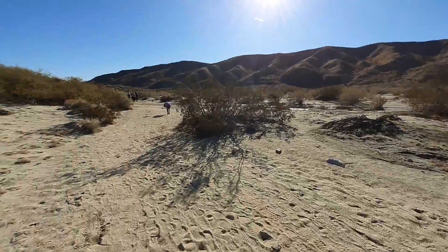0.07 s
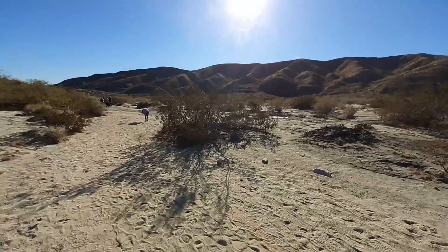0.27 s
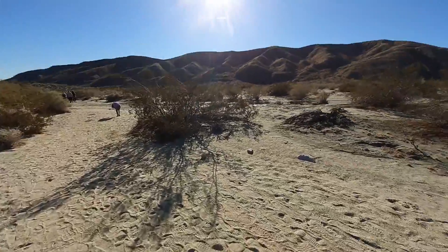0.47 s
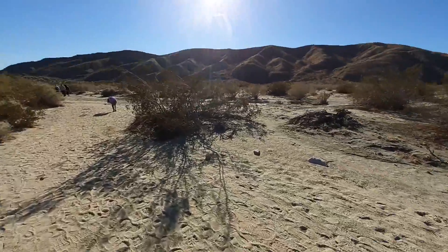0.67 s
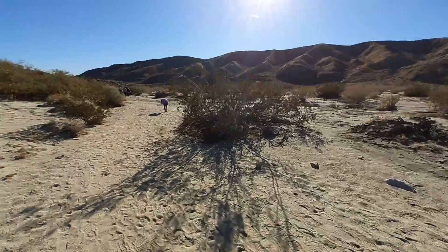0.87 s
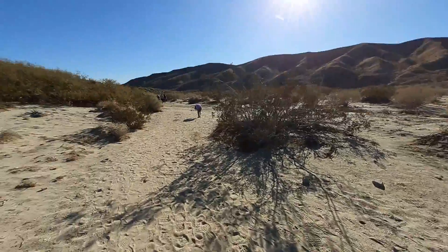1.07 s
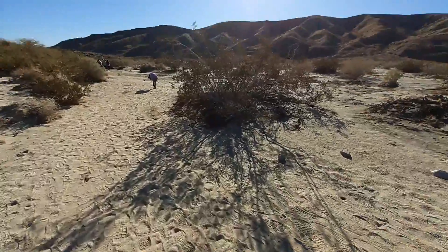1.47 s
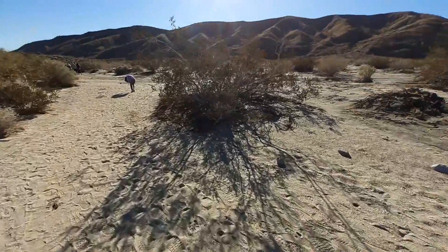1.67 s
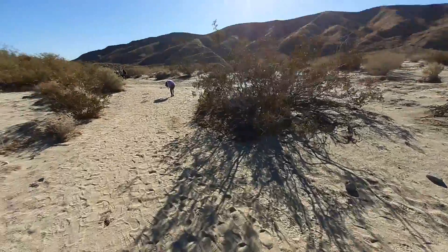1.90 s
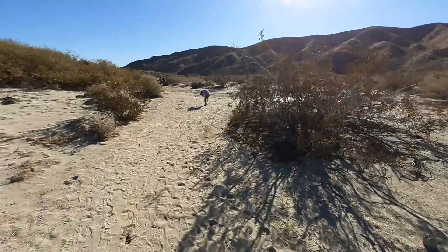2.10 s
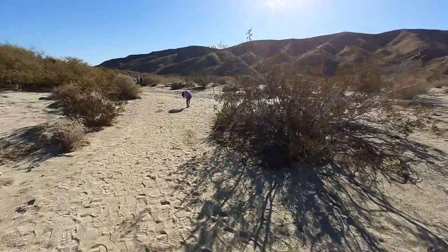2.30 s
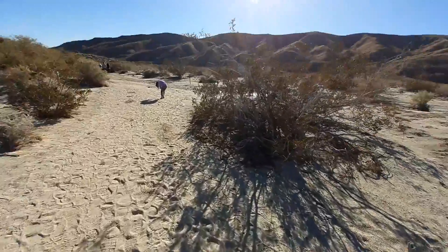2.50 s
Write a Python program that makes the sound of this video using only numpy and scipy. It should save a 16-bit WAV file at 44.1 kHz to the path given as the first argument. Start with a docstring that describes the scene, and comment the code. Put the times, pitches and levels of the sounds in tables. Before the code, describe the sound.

Light wind buffets the microphone throughout, a low rumble with soft thumps and hiss, mostly on the right. It gusts hardest from 0.7 to 1 second, swells again around 1.3 and 1.8, then eases. Underneath, five soft steps crunch on sand at about 0.1, 0.7, 1.2, 1.7 and 2.2 seconds. Carried gear rustles close by, with tiny metal clinks, clearest near 0.9 and 1.3 seconds. There is no echo.

```python
"""Light wind buffets the microphone of a hand-held camera, mostly its right port, over a soft hiss.
Below it, five walking steps cross a sandy desert trail, in open air with no echo.
Each sole grinds through the sand and snaps a few bits of grit. Close by, carried gear rustles
and small metal pieces, perhaps zip pulls, knock and ring with the stride."""
import sys
import numpy as np
from scipy import signal
from scipy.fft import rfft, irfft, next_fast_len
from scipy.io import wavfile
from scipy.ndimage import uniform_filter1d

SR = 44100
rng = np.random.default_rng(int(sys.argv[2]) if len(sys.argv) > 2 else 0)


def wav_out(sig):
    """Save sig, one row per channel (or a flat mono array), as 16-bit PCM at SR to the path in sys.argv[1]."""
    wavfile.write(sys.argv[1], SR, np.round(np.clip(np.atleast_2d(sig).T, -1, 1) * 32767).astype(np.int16))


N = 116865


def undb(db):
    return 10 ** (np.asarray(db) / 20)


def unit(x):
    """Scale to rms 1."""
    return x / np.sqrt(np.mean(x ** 2) + 1e-20)


def pan(db):
    """Gains for the two ports, the left louder by db."""
    return unit(undb(np.array([[db], [-db]]) / 2))


def curve(points):
    """Points joined by straight lines in time."""
    return np.interp(np.arange(N) / SR, *np.array(points).T)


def over_hz(points, size):
    """Points joined on a log-frequency axis, one value per bin."""
    hz, value = np.array(points).T
    bin_hz = np.arange(size // 2 + 1) * SR / size
    return np.interp(np.log(bin_hz + 1), np.log(hz), value)


def colour(x, spectrum, size=4096):
    """Causal filter of unit energy: only the shape of the spectrum counts."""
    cepstrum = irfft(np.log(undb(over_hz(spectrum, size))))
    cepstrum[1:size // 2] *= 2  # fold to minimum phase
    cepstrum[size // 2 + 1:] = 0
    impulse = irfft(np.exp(rfft(cepstrum)))
    return signal.fftconvolve(x, impulse[None] / np.linalg.norm(impulse))[:, :N]


def grains(per_s, spread_db):
    """Random clicks, many small and a few large, at the same moments on both ports; rms 1."""
    hit = rng.random(N) < per_s / SR
    size = undb(spread_db * np.minimum(rng.exponential(size=N), 5))
    return unit(hit * size * rng.standard_normal((2, N)))


def burst(start, decay_s, crack_db):
    """A sharp click on both ports, then noise that dies away."""
    age = np.arange(N) - int(start * SR)
    tail = (age >= 0) * np.exp(-np.abs(age) / SR / decay_s) * rng.standard_normal((2, N))
    return tail + undb(crack_db) * (age == 0)


def wander(per_s):
    """Random levels joined smoothly; rms 1."""
    hold = int(SR / per_s)
    stairs = np.repeat(rng.standard_normal(N)[:N // hold + 1], hold)
    return unit(uniform_filter1d(stairs, hold)[:N])


# How alike the microphone's two ports sound. Each row: frequency in Hz, correlation.
PORT_LIKENESS = [(200, 1), (900, 0.75), (1600, 0.3), (2600, 0.04), (6000, 0.076), (16000, 0.11)]
def at_ports(pair):
    """Turn two unrelated signals into a left and right that agree in the bass."""
    size = next_fast_len(2 * N)
    alike = np.clip(over_hz(PORT_LIKENESS, size), -.95, .98)
    first, second = rfft(pair, size)
    mid = first * np.sqrt((1 + alike) / 2)
    side = second * np.sqrt((1 - alike) / 2)
    return irfft(np.array([mid + side, mid - side]), size)[:, :N]


# Wind right on the microphone, port by port. Each row: time in seconds, level in dB.
WIND_LEFT = [(0, -50), (.4, -48.5), (.65, -43), (.8, -29.5), (.94, -36.5), (1.08, -47), (1.35, -48),
             (1.65, -47.5), (1.82, -38.5), (1.99, -40), (2.099, -50), (2.38, -54), (2.461, -40.5),
             (2.6, -52.5)]
WIND_RIGHT = [(0, -38.5), (.14, -36), (.35, -35.5), (.57, -35.5), (.65, -29.5), (.78, -28.5), (.93, -27),
              (1.03, -35.5), (1.3, -32), (1.42, -41.5), (1.498, -34.5), (1.6, -53), (1.72, -32.5),
              (1.97, -34.5), (2.04, -47.5), (2.14, -35.5), (2.33, -41), (2.54, -57), (2.65, -42)]
# Tone of the rumble on each port. Each row: frequency in Hz, relative level in dB.
RUMBLE_LEFT = [(20, -32.5), (35, -20), (55, 6), (90, 1), (150, -10), (230, -14.5), (330, -18.5), (480, -30),
               (800, -33.5), (2000, -51.5)]
RUMBLE_RIGHT = [(20, -47.5), (35, -35), (55, 1), (100, 2.5), (160, -2), (230, -11.5), (330, -19.5),
                (480, -36.5), (800, -53), (2000, -86.5)]
def wind_rumble():
    """Eddies buffet each port separately."""
    ports = []
    for spectrum, level in ((RUMBLE_LEFT, WIND_LEFT), (RUMBLE_RIGHT, WIND_RIGHT)):
        eddies = colour(grains(per_s=900, spread_db=1.5), spectrum)[0]
        ports.append(unit(eddies) * undb(curve(level)))
    return np.array(ports)


# Wind fluttering at the microphone. Each row: time in seconds, level in dB.
FLUTTER_LEVEL = [(0, -58), (.3, -85), (.45, -57), (.56, -62.5), (.78, -52), (.93, -54.5), (1.12, -54),
                 (1.25, -52.5), (1.4, -64), (1.47, -51), (1.58, -66), (1.71, -51.5), (2.0, -63), (2.3, -61),
                 (2.6, -76)]
# Its tone, strongest near 330 Hz. Each row: frequency in Hz, relative level in dB.
FLUTTER_TONE = [(100, -20.5), (220, -2.5), (330, 2.5), (480, -6), (800, -13.5), (1500, -35), (4000, -43)]
def wind_flutter():
    """Small quick eddies patter above the rumble."""
    patter = at_ports(colour(grains(per_s=350, spread_db=3.5), FLUTTER_TONE))
    return patter * undb(curve(FLUTTER_LEVEL)) * pan(-2.5)


# Hiss behind the wind. Each row: time in seconds, relative level in dB.
HISS_LEVEL = [(0, -55.5), (.1, -59.5), (.25, -52), (.37, -64.5), (.47, -55.5), (.65, -59.5), (.76, -51.5),
              (.92, -54.5), (1.05, -52), (1.28, -53.5), (1.42, -59.5), (1.52, -54), (1.65, -57), (1.8, -56),
              (1.91, -60), (2.02, -54), (2.3, -54.5), (2.45, -66), (2.6, -56)]
# Tones of the hiss and the open air. Each row: frequency in Hz, relative level in dB.
HISS_TONE = [(700, -16), (1300, -2.5), (2200, 2), (3000, -1), (4000, -19), (6000, -22.5), (16000, -19.5)]
AIR_TONE = [(100, 17), (400, 4), (600, -2.5), (1200, 3.5), (1700, 0), (2600, -8), (5000, -25), (16000, -35)]
def hiss():
    """A soft hiss on the right swells, sinks and flickers; duller air on both sides follows it."""
    hiss_db = curve(HISS_LEVEL) + 0.97 * wander(per_s=45)
    air_db = -58 + 0.79 * (hiss_db - hiss_db.mean())
    bright = colour(rng.standard_normal((2, N)), HISS_TONE) * undb(hiss_db - 4.5) * pan(-28)
    dull = at_ports(colour(rng.standard_normal((2, N)), AIR_TONE)) * undb(air_db)
    return bright + dull


# Modes of the metal pieces. Each row: pitch in Hz, relative level in dB, seconds to fall 60 dB.
METAL_MODES = [(6220, 7, 0.059), (6750, 11.5, .025), (8680, 5, 0.075), (9950, 15, 0.01),
               (10750, 16.5, 0.087), (11800, 7, 0.054), (13200, 0, 0.059), (13400, -24, 0.019),
               (15100, -2, 0.11), (15600, 20, 0.028)]
def metal_ring(knocks, favoured_hz=None, size=8192):
    """Struck metal rings, a little detuned on each call; modes near a favoured pitch are lifted."""
    lift_db, width_hz, detune = 10, 694, .005
    hz, db, t60 = np.array(METAL_MODES).T[:, :, None]
    t = np.arange(size) / SR
    if favoured_hz is not None:
        db = db + lift_db * np.exp(-((hz - favoured_hz) / width_hz) ** 2)
    hz = hz * (1 + detune * rng.standard_normal(hz.shape))
    phase = rng.random((2, len(METAL_MODES), 1))
    decay = undb(db) / np.sqrt(t60) * np.exp(-np.log(1000) * t / t60)
    impulse = (decay * np.sin(2 * np.pi * (hz * t + phase))).sum(axis=1)
    return signal.oaconvolve(knocks, unit(impulse) / np.sqrt(size), axes=1)[:, :N]


# Gear stirring close to the microphone. Each row: time in seconds, level in dB.
RUSTLE_LEVEL = [(0, -60.5), (.1, -57.5), (.28, -53), (.39, -67), (.52, -60), (.68, -64.5), (.85, -59.5),
                (.95, -62), (1.15, -53.5), (1.33, -57), (1.42, -64), (1.53, -59), (1.62, -63.5),
                (1.72, -52.5), (2.04, -62), (2.15, -55), (2.36, -65), (2.48, -65.5), (2.65, -68)]
# Tone of the rustle. Each row: frequency in Hz, relative level in dB.
RUSTLE_TONE = [(2500, -6.5), (4500, -11.5), (6500, -2), (7600, -6), (9000, 1.5), (11000, 2.5), (12500, -3),
               (16000, 0)]
def gear_rustle():
    """Carried gear rustles all along, and tiny knocks set its metal tinkling."""
    stir = undb(curve(RUSTLE_LEVEL)) * pan(-3.5)
    rustle = colour(stir * grains(per_s=3500, spread_db=0), RUSTLE_TONE)
    tinkle = metal_ring(stir * grains(per_s=52, spread_db=0))
    return rustle + undb(-8) * tinkle


# Grit breaking underfoot. Each row: start in seconds, relative level in dB.
GRIT_SNAPS = [(0.124, -41), (0.155, -42), (0.261, -43), (0.292, -40), (0.624, -45.5), (0.656, -38),
              (0.726, -29.5), (0.739, -35), (0.763, -33), (0.822, -40), (0.896, -33), (1.736, -29.5),
              (1.76, -28), (1.823, -78), (1.946, -34.5), (2.257, -37.5), (2.367, -46)]
# Tone of a snap. Each row: frequency in Hz, relative level in dB.
SNAP_TONE = [(200, -10), (500, -4.5), (900, 4.5), (1400, 7.5), (2000, -4.5), (3200, -20.5), (5000, -49),
             (10000, -11), (16000, -19)]
def grit_snaps():
    """Each bit of grit cracks under the sole, then briefly crumbles."""
    snaps = sum(undb(db - 9) * burst(start, decay_s=0.0056, crack_db=17)[0] for start, db in GRIT_SNAPS)
    return colour(snaps * pan(-2), SNAP_TONE)


# Soles on the trail below the camera; the two short rows are the forefoot following.
# Each row: start, length and attack in seconds, then levels of sand and crunch in dB.
STEPS = [(0.146, 0.17, 0.023, -52, -60), (0.692, 0.11, 0.052, -52, -53.5),
         (0.855, .035, 0.0079, -73, -51.5), (1.192, 0.12, .03, -49.5, -55),
         (1.703, 0.11, 0.068, -52.5, -47.5), (1.945, 0.016, 0.014, -77, -52.5),
         (2.224, 0.15, 0.045, -50, -62.5)]
# Tones of sliding sand and of the crunch. Each row: frequency in Hz, relative level in dB.
SAND_TONE = [(200, 5.5), (550, -4.5), (800, 6), (1300, -9.5), (2300, 1), (4500, -7), (7200, -11),
             (9000, -6), (12000, -11.5), (16000, -13)]
CRUNCH_TONE = [(150, -38.5), (400, 3), (800, 4.5), (1350, 6.5), (2000, -9.5), (3200, -22), (5000, -88),
               (10000, -11), (16000, -18)]
def footsteps():
    """Sand gives way in clumps while the sole moves; coarser grains crunch under the weight."""
    sand_release_s, crunch_release_s, clump_db = 0.011, 0.033, 2.4
    t = np.arange(N) / SR
    slide, press = np.zeros(N), np.zeros(N)
    for start, length, attack_s, sand_db, crunch_db in STEPS:
        rise = np.clip((t - start) / attack_s + .5, 0, 1)
        since_end = np.maximum(t - start - length, 0)
        slide += undb(sand_db) * rise * np.exp(-since_end / sand_release_s)
        press += undb(crunch_db) * rise * np.exp(-since_end / crunch_release_s)
    clumps = unit(undb(clump_db * np.clip(wander(per_s=120), -2, 2)))
    sand = colour(slide * clumps * grains(per_s=5200, spread_db=1.5), SAND_TONE)
    crunch = colour(press * grains(per_s=600, spread_db=2.5), CRUNCH_TONE)
    return at_ports(sand + crunch) * pan(0.5)


# Metal knocking near the microphone. Each row: start in seconds, relative levels of contact and ring
# in dB, left over right in dB, favoured pitch in Hz, decay of the rattle in seconds.
CLINKS = [(0.244, -43.5, -44, 8, 13100, 0.0069), (0.295, -41, -45.5, -1, 12300, 0.0072),
          (0.657, -56, -51, -11, 10900, .004), (0.728, -44.5, -49, -6, 15600, 0.012),
          (0.765, -50, -44, -8, 11800, 0.0075), (0.821, -48.5, -46, -3, 15600, 0.018),
          (0.849, -53, -66, 5, 11100, 0.0075), (0.8635, -26.5, -37, 11, 15600, 0.00084),
          (0.867, -45.5, -38.5, -14, 10750, 0.0075), (1.047, -51, -55, 2, 14500, 0.0091),
          (1.149, -46, -38, -4, 9100, 0.001), (1.174, -38.5, -36.5, 7, 15600, 0.0028),
          (1.301, -41, -51, 6, 14500, 0.0039), (1.312, -40, -41.5, -8, 14500, .013),
          (1.329, -23.5, -39, 1.5, 11800, 0.0012), (1.523, -54, -57, -13, 13400, 0.0095),
          (1.737, -44, -32.5, -5, 10750, .002), (1.763, -39.5, -56, -3, 11200, 0.0039),
          (1.798, -73, -44, -7, 11800, .014), (1.946, -56, -46.5, 10, 15600, 0.023),
          (2.2, -44, -45, 6, 15600, 0.0039), (2.268, -49, -65, -2, 10400, 0.019),
          (2.304, -45, -44, 1, 14500, 0.028), (2.344, -42, -40, 5, 14000, 0.011),
          (2.360, -37, -49, -8, 13400, 0.0031), (2.44, -62, -74, 5, 14500, .006),
          (2.551, -53.5, -57, -4, 11100, 0.0088)]
# Tone of the bare contact. Each row: frequency in Hz, relative level in dB.
CONTACT_TONE = [(1000, -11), (3500, -15), (5200, -29), (7500, -15), (10000, -8.5), (13000, -10.5),
                (16000, -12)]
def metal_clinks():
    """At each jolt a piece touches, rattles and rings; the contact is brighter around its pitch."""
    lift_db, width_hz = 8.5, 2260
    out = np.zeros((2, N))
    for start, contact_db, ring_db, pan_db, pitch_hz, rattle_s in CLINKS:
        knock = pan(pan_db) * burst(start, rattle_s, crack_db=6)
        tone = [(hz, db + lift_db * np.exp(-((hz - pitch_hz) / width_hz) ** 2))
                for hz, db in CONTACT_TONE]
        out += undb(contact_db + 1.5) * colour(knock, tone, size=512)
        out += undb(ring_db) * metal_ring(knock, pitch_hz)
    return out


# Bumps on the microphone itself. Each row: start in seconds, relative level in dB, pitch in Hz.
THUDS = [(0.343, -24, 153), (0.443, -25.5, 169), (0.762, -15, 156.4), (0.839, -19, 135),
         (0.897, -19.5, 156), (0.945, -15.5, 125), (1.006, -23, 220), (1.107, -20.5, 157),
         (1.121, -27, 248), (1.27, -18.5, 130), (1.455, -24.5, 111), (1.484, -38.5, 240), (1.654, -33, 198),
         (1.698, -23, 270), (1.714, -24, 223), (1.89, -26, 112), (2.354, -24, 105)]
def microphone_thuds():
    """Wind or handling lands as low, two-cycle thuds, almost wholly on the right port."""
    t = np.arange(N) / SR
    out = np.zeros((2, N))
    for start, db, hz in THUDS:
        cycles = np.clip((t - start) * hz, 0, 2)
        swell = np.sin(np.pi * cycles / 2)
        out += undb(db - 3.5) * pan(-24) * swell * np.sin(2 * np.pi * cycles)
    return out


def scene():
    """The walker and the wind on the open trail, heard from the hand."""
    walker = footsteps() + grit_snaps() + gear_rustle() + metal_clinks()
    return walker + wind_rumble() + microphone_thuds() + hiss() + wind_flutter()


def record(dry):
    """The camera cuts the treble steeply above 16 kHz."""
    return signal.sosfilt(signal.ellip(10, .2, 80, 16000, fs=SR, output="sos"), dry)


dry = scene()
out = record(dry)
wav_out(out)
```